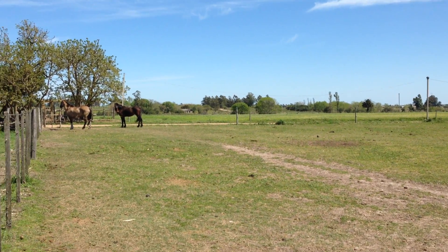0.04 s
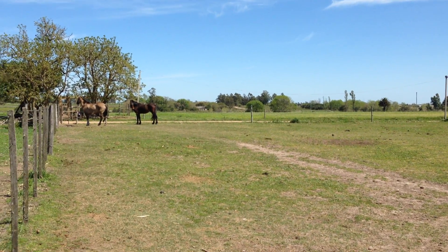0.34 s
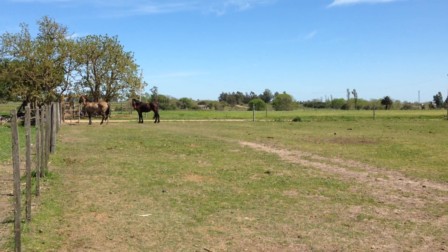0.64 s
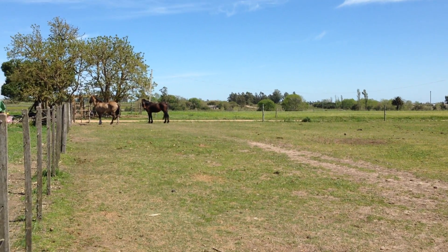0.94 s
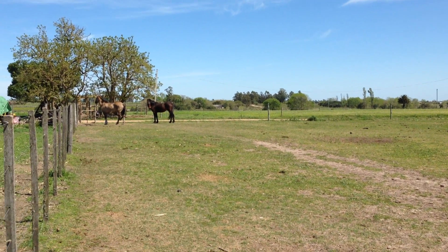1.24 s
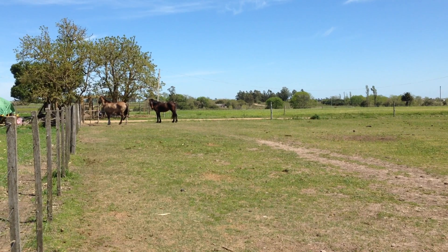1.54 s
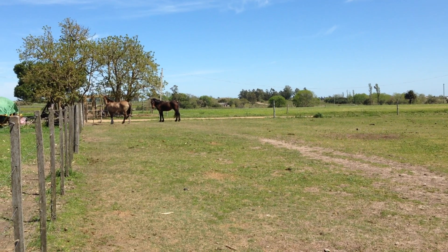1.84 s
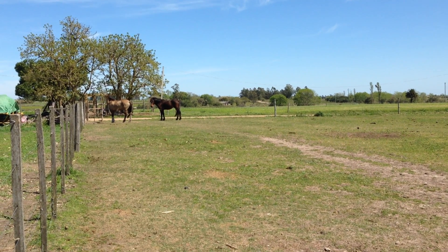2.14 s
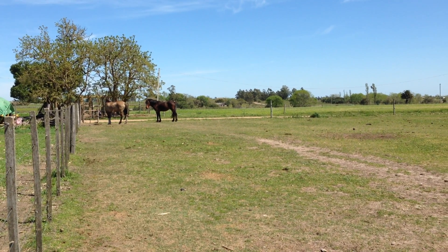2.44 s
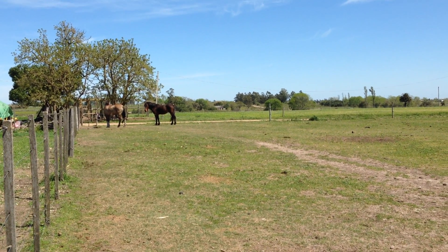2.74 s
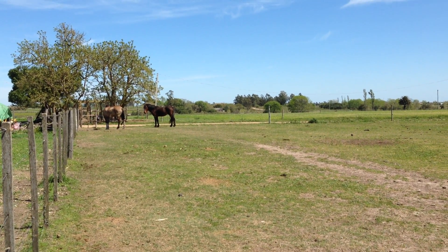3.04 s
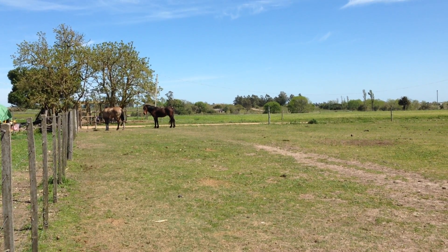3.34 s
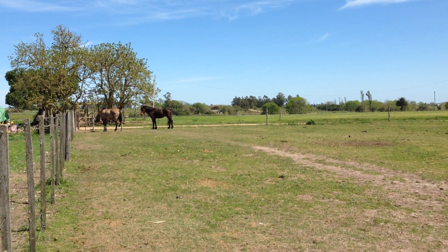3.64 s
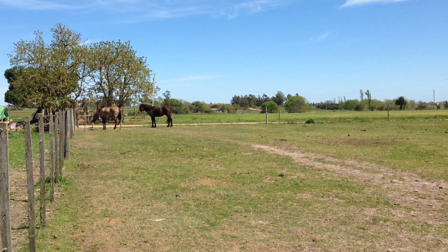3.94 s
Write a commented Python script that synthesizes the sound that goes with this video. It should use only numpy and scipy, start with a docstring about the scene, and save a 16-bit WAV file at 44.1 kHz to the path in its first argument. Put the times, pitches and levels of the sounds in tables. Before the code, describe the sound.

A distant horse gives a single high whinny that grows hoarse and fades in a breathy rasp. Before and during it, wind thumps unevenly on the microphone in an open field, over a soft hiss and barely audible birds.

```python
"""Distant whinny in a windy paddock

A horse calls from far away with two voices at once: a clean rising squeal breaks into a rough quaver
over a lower voice and fades in a rasp of air, with a short echo from the trees. Close by, wind rumbles
and its eddies buffet the microphone throughout. Small birds whistle faintly over a soft hiss."""
import sys
import numpy as np
from scipy import signal
from scipy.fft import rfft, irfft, next_fast_len
from scipy.io import wavfile
from scipy.ndimage import uniform_filter1d, map_coordinates

SR = 44100
rng = np.random.default_rng(int(sys.argv[2]) if len(sys.argv) > 2 else 0)


def generate_wav(sig):
    """Save sig (samples, or channels by samples) to the path in sys.argv[1] as 16-bit PCM at SR."""
    pcm = np.round(np.clip(np.atleast_2d(sig).T, -1, 1) * 32767).astype(np.int16)
    wavfile.write(sys.argv[1], SR, pcm)


N = 176400


def amp(db):
    """Decibels to gain."""
    return 10 ** (np.asarray(db) / 20)


def unit(x):
    """Scale to rms 1."""
    return x / np.sqrt(np.mean(x ** 2) + 1e-20)


def curves(rows):
    """One per-sample curve for each column after the time."""
    times, *columns = np.transpose(rows)
    return [np.interp(np.arange(N) / SR, times, column) for column in columns]


def wobble(rate):
    """A smooth random curve with `rate` knots a second."""
    return map_coordinates(rng.standard_normal(8000), [np.arange(N) * rate / SR + 2], mode="mirror")


def filtered(x, response):
    """Equalise x with a gain given as a function of frequency."""
    size = next_fast_len(len(x) + 8192)
    return irfft(rfft(x, size) * response(np.fft.rfftfreq(size, 1 / SR)), size)[:len(x)]


def noise(colour):
    """Noise of rms 1, shaped by rows of (frequency [Hz], level [dB])."""
    freqs, db = np.transpose(colour)
    white = rng.standard_normal(N)
    return unit(filtered(white, lambda hz: amp(np.interp(np.log(hz + 1), np.log(freqs), db))))


def phase(hz):
    """Running phase of a pitch curve."""
    return 2 * np.pi * np.cumsum(hz) / SR


def rumble():
    """Low wind turbulence, with small eddies fluttering on it."""
    # swell of the wind (time [s], level [dB])
    swell = [(0, -41), (.45, -32), (.6, -40), (.76, -47.5), (.93, -36.5), (1.1, -38), (1.27, -49.5),
             (1.38, -32.5), (1.52, -41), (1.68, -35), (1.81, -47), (1.93, -30.5), (2.05, -38.5),
             (2.32, -46.5), (2.5, -32), (2.64, -44), (2.8, -39), (2.95, -26), (3.18, -39), (3.4, -33.5),
             (3.68, -26.5), (3.85, -30), (3.93, -27.5), (4, -11.5)]
    # spectra of the deep roll and the small eddies (frequency [Hz], level [dB])
    roll_colour = [(15, -34.5), (25, -37), (40, -6.5), (60, -4), (90, 0), (140, -11.5), (250, -24.5),
                   (400, -36.5), (700, -57.5), (1500, -60), (4000, -110)]
    flutter_colour = [(40, -11), (110, 0), (200, 4.5), (320, -4.5), (500, -18), (800, -26.5), (1500, -73),
                      (4000, -110)]
    swell_db, = curves(swell)
    roll = unit(noise(roll_colour) * amp(0.7 * wobble(21.68)))
    flutter = unit(noise(flutter_colour) * amp(9.5 * np.tanh(wobble(90))))
    return amp(swell_db + 1.0) * (roll + amp(-7.5) * flutter)


def air():
    """A steady bed of far ambience and hiss."""
    # spectrum of the bed (frequency [Hz], relative level [dB])
    colour = [(100, 11), (500, 4), (1000, 7), (2000, 1), (4000, -2), (8000, -4.5), (15000, -5.5)]
    return amp(-65) * noise(colour)


def puff(x, dullness, low_hz):
    """A pressure puff of energy 1 whose treble falls by `dullness` dB per kHz."""
    x = filtered(x, lambda hz: amp(-dullness * hz / 1000) * hz ** 2 / (hz ** 2 + low_hz ** 2))
    return x / np.linalg.norm(x)


def buffets():
    """Each eddy hits the microphone with one sharp kick inside a duller, ragged swirl."""
    # eddies (time [s], level [dB], nominal length [s], nominal dullness [dB/kHz])
    eddies = [(0.058, -24, 0.022, 86), (0.131, -18.5, 0.0053, 91), (0.163, -21, 0.0059, 79),
              (0.19, -20, 0.0075, 83), (0.285, -16.5, 0.0086, 41.5), (0.304, -22.5, 0.016, 53),
              (0.361, -29.5, 0.023, 44.5), (0.462, -26.5, 0.01, 58), (0.489, -23.5, 0.019, 77),
              (0.505, -15, 0.013, 45.5), (0.673, -29.5, 0.017, 98), (0.809, -25.5, 0.012, 95),
              (0.922, -29, 0.023, 76.5), (1.016, -19.5, 0.012, 77), (1.091, -18, 0.02, 55),
              (1.119, -17, 0.0074, 44), (1.204, -22, 0.016, 57), (1.347, -21, 0.012, 52.5),
              (1.403, -26, 0.005, 68), (1.462, -14.5, 0.0085, 48.5), (1.577, -28.5, 0.023, 61),
              (1.649, -24, 0.0087, 68), (1.948, -17, 0.0064, 45.5), (2.076, -24.5, 0.016, 60.5),
              (2.129, -30.5, 0.022, 67), (2.209, -18, 0.012, 61), (2.233, -24.5, 0.0084, 64),
              (2.268, -30, 0.018, 52), (2.473, -22, 0.0087, 77), (2.509, -17.5, 0.012, 68),
              (2.561, -26, 0.015, 65), (2.694, -14.5, 0.008, 48.5), (2.712, -20.5, 0.0069, 62),
              (2.79, -23, 0.0088, 90), (2.853, -18.5, 0.0076, 53), (2.897, -14, 0.011, 38),
              (2.908, -12.5, 0.0047, 35), (2.943, -19.5, 0.019, 38), (3.034, -24.5, 0.013, 50),
              (3.292, -18, 0.009, 84), (3.328, -25, 0.0095, 51), (3.354, -28, 0.015, 59),
              (3.388, -21, 0.0081, 53), (3.463, -15, 0.006, 77), (3.498, -22.5, 0.012, 47.5),
              (3.568, -25.5, 0.016, 82), (3.642, -16.5, 0.008, 40), (3.772, -13.5, 0.0037, 43),
              (3.879, -18.5, 0.0046, 33.5), (3.889, -17, 0.012, 49.5), (3.954, -12, 0.0034, 34.5),
              (3.961, -16.5, 0.0061, 30), (3.983, -14, 0.0083, 25.5)]
    size, wake_db, wake_s = 8192, -28.5, 0.028
    out = np.zeros(N + 2 * size)
    t = (np.arange(size) - size // 2) / SR
    spike = signal.hilbert(1.0 * (t == 0))
    for time, db, length, dullness in eddies:
        scatter, white = rng.standard_normal((2, size))
        click = scatter[0] * spike.real + scatter[1] * spike.imag  # an impulse of random phase
        kick = puff(click, 0.95 * dullness, low_hz=233)
        shape = np.exp(-(t / (0.73 * length)) ** 2 / 2) + amp(wake_db) * np.exp(-np.abs(t) / wake_s)
        ragged = amp(4.5 * map_coordinates(scatter, [np.arange(size) * 220 / SR + 2]))
        swirl = puff(white * shape * ragged, 1.188 * dullness, low_hz=103)
        kick *= np.sign(kick @ swirl)  # both push the same way
        thump = amp(-3.5) * kick + amp(0.5) * swirl
        out[int(time * SR):][:size] += amp(db) * np.sqrt(length * SR) * thump / np.linalg.norm(thump)
    return out[size // 2:][:N]


def birds():
    """Thin, far chirps and whistles that swell, flicker and fade."""
    # chirps (centre [s], half-length [s], pitch [Hz], glide [Hz/s], level [dB])
    chirps = [(.23, 0.033, 5360, 2, -75.5), (0.275, 0.068, 3730, 7, -73), (0.555, 0.066, 3180, 503, -74.5),
              (0.577, 0.13, 3750, 2, -78), (0.724, 0.0033, 1120, -40000, -47),
              (1.74, 0.028, 3210, -2.5, -78), (2.103, .14, 3720, -4.5, -75), (2.258, 0.018, 4380, -2, -66),
              (2.326, 0.021, 9640, 4, -71)]
    t = np.arange(N) / SR
    flicker = amp(3 * wobble(55))
    out = np.zeros(N)
    for centre, half_length, hz, glide, db in chirps:
        swell = np.exp(-2 * ((t - centre) / half_length) ** 2)
        pitch = hz + glide * (t - centre) + 18 * wobble(110)
        out += amp(db) * swell * np.sin(phase(pitch))
    return np.sqrt(2) * flicker * out


def squeal(rough, low_phase):
    """The whistling upper voice: the lower one modulates it, and roughness frays it."""
    # melody of the squeal (time [s], pitch [Hz])
    melody = [(2.22, 1335), (2.27, 1487), (2.335, 1644), (2.40, 1667), (2.47, 1701), (2.56, 1722),
              (2.62, 1679), (2.725, 1704), (2.755, 1569), (2.8, 1655), (2.87, 1741), (2.92, 1575),
              (2.96, 1640), (3.01, 1729), (3.06, 1703), (3.115, 1537), (3.18, 1720), (3.27, 1642),
              (3.37, 1665), (3.435, 1673), (3.462, 1550), (3.5, 1625), (3.54, 1632), (3.65, 1507)]
    # levels of its partials (time [s], first [dB], second [dB], third [dB])
    partials = [(2.215, -65, -100, -110), (2.238, -59, -66.5, -92), (2.29, -54, -65, -81),
                (2.35, -57.5, -57, -56.5), (2.43, -54.5, -52.5, -54), (2.53, -56.5, -52, -59.5),
                (2.62, -52, -54, -70), (2.71, -58, -61.5, -63), (2.76, -44, -57.5, -71),
                (2.84, -58.5, -62, -64), (2.95, -43.5, -68, -73), (3.01, -49.5, -57.5, -62),
                (3.09, -57, -68, -67), (3.18, -48, -55.5, -65), (3.27, -60, -102, -69),
                (3.39, -50.5, -85, -73), (3.43, -50.5, -82, -84), (3.46, -78, -70, -69),
                (3.495, -62, -77, -58), (3.56, -61, -81, -74), (3.65, -67, -100, -100)]
    # it rides on the lower voice at first (time [s], sideband depth [gain])
    locking = [(2.22, 0.47), (2.45, 1.15), (2.54, 1.3), (2.66, 0.06), (3.65, .1)]
    # sidebands on each partial (upper [gain], lower [gain])
    sidebands = [(0.34, 0.065), (0.2, 0.15), (.05, .02)]
    quaver, jitter, fray, growl_depth = 0.007, 0.015, 0.19, 0.11
    hz, = curves(melody)
    levels = curves(partials)
    lock, = curves(locking)
    hz *= 1 + quaver * rough * wobble(35) + 0.00386 * wobble(120)
    high_phase = phase(hz * (1 + jitter * rough * wobble(200)))
    under_phase = phase(hz * 0.915 * (1 + jitter * wobble(200)))  # a hoarse strand just below
    out = amp(levels[2] - 19.5) * np.sin(4 * high_phase)  # the fourth partial follows the third
    for k, (db, (above, below)) in enumerate(zip(levels, sidebands), 1):
        shimmer = amp((2 + 2.4 * rough) * wobble(130) - rough * k)
        partial = k * (high_phase + fray * k * rough * wobble(520))
        beat = low_phase + 0.9 * wobble(220)
        tone = np.sin(partial) + lock * (above * np.sin(partial + beat) + below * np.sin(partial - beat))
        undertone = amp(-7.5 + 6.3 * wobble(26.87)) * np.sin(k * under_phase)
        growl = growl_depth * np.sin(partial - beat / 2)
        out += amp(db) * (shimmer * tone + rough * (undertone + growl))
    return out


def lower_voice(rough, low_phase, voice_db):
    """The body of the call, which doubles its period as the call breaks."""
    # main and half-way partials (multiple of the pitch [ratio], relative level [dB])
    partials = [(.5, -8), (1, 2.5), (2, -26.5)]
    half_partials = [(1.5, -11), (2.5, -7)]
    # strength of the period doubling (time [s], level [dB])
    doubling = [(2.53, -88), (2.575, -54), (2.7, -56), (2.9, -69), (3.25, -70), (3.6, -74)]
    doubling_db, = curves(doubling)
    tone = sum(amp(db) * np.sin(k * low_phase) for k, db in partials)
    out = amp(voice_db + 3.5 * wobble(50)) * tone
    for k, db in half_partials:
        out += amp(doubling_db + db + 3.64 * wobble(70)) * np.sin(k * low_phase + rough * wobble(220))
    return out


def patchy(x, depth_db):
    """Roughen x with short, narrow-band patches of random gain; the result has rms 1."""
    spectrum = signal.stft(x, nperseg=512)[2]
    patches = uniform_filter1d(rng.standard_normal(spectrum.shape), size=3, axis=0)
    patches = uniform_filter1d(patches, size=8, axis=1)
    return unit(signal.istft(spectrum * amp(depth_db * unit(patches)), nperseg=512)[1][:N])


def rasp(low_phase, rasp_db):
    """Air rasps through the call, pulsing at half the lower pitch."""
    # spectrum of the breath (frequency [Hz], level [dB])
    colour = [(200, -10), (500, 1.5), (700, -14), (870, -4.5), (1130, -20.5), (1400, -3), (1620, 3),
              (1780, -4.5), (1930, -10), (2200, -9), (2530, -19), (2800, -14), (3400, -10.5), (4000, -8),
              (4600, -20.5), (5200, -12.5), (5750, -13.5), (6500, -27.5), (8300, -27), (11000, -42)]
    breath = patchy(noise(colour), depth_db=4.0)
    pulse = 1 + 0.13 * np.cos(low_phase / 2)
    return breath * pulse * amp(rasp_db + 2.02 * wobble(60))


def whinny():
    """The horse sounds two voices at once, and both grow hoarse as air rasps through."""
    # the lower voice (time [s], pitch [Hz], level [dB])
    voice = [(2.22, 572.7, -57), (2.33, 546.6, -82), (2.52, 545, -72), (2.58, 565, -57), (2.72, 570.7, -48),
             (2.82, 563.4, -52), (2.96, 550.2, -43.5), (3.02, 591, -44), (3.08, 506.3, -55.5),
             (3.13, 536.6, -57), (3.17, 577, -44.5), (3.2, 539, -41), (3.24, 465.3, -59), (3.34, 564, -46),
             (3.44, 511, -60), (3.53, 506, -42), (3.63, 461, -76)]
    # hoarseness (time [s], roughness [0 clean, about 1 hoarse], rasp level [dB])
    hoarseness = [(2.21, .2, -100), (2.25, 0.15, -66), (2.33, 0.23, -59.5), (2.42, 0.19, -63),
                  (2.53, 0.31, -63.5), (2.62, 0.54, -53.5), (2.76, 0.83, -53.5), (2.95, 0.79, -52.5),
                  (3.1, 0.65, -54), (3.18, 0.37, -50), (3.28, 0.63, -55.5), (3.38, 0.3, -54),
                  (3.48, 0.17, -57.5), (3.56, .8, -55), (3.72, 1.06, -78)]
    # fade in and out of the call (time [s], gain [0-1])
    call = [(2.212, 0), (2.228, 1), (3.6, 1), (3.72, 0)]
    voice_hz, voice_db = curves(voice)
    rough, rasp_db = curves(hoarseness)
    gate, = curves(call)
    low_phase = phase(voice_hz * (1 + 0.021 * rough * wobble(150)))
    voices = squeal(rough, low_phase) + lower_voice(rough, low_phase, voice_db)
    return amp(-1.0) * gate * (np.sqrt(2) * voices + rasp(low_phase, rasp_db))


def tree_echo(x):
    """The trees scatter the sound back as a short, diffuse tail."""
    echo_db, t60_s, delay_s = -10, 0.24, 0.012
    t = np.arange(SR) / SR
    tail = rng.standard_normal(SR) * amp(-60 * t / t60_s) * (t > delay_s)
    return amp(echo_db) * signal.fftconvolve(x, tail / np.linalg.norm(tail))[:N]


def scene():
    """The far horse with its echo, faint birds and close wind, in mono."""
    horse = whinny()
    return (horse + tree_echo(horse) + birds() + buffets() + rumble() + air())[None]


def record(dry):
    """A hard low-pass takes off the very top of the treble."""
    top_hz = 15350
    return np.array([filtered(x, lambda hz: hz < top_hz) for x in dry])


dry = scene()
out = record(dry)
generate_wav(out)
```